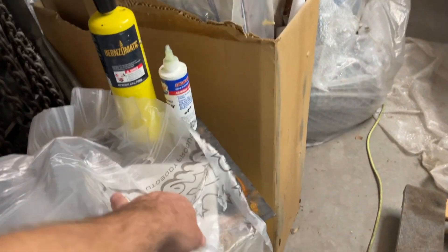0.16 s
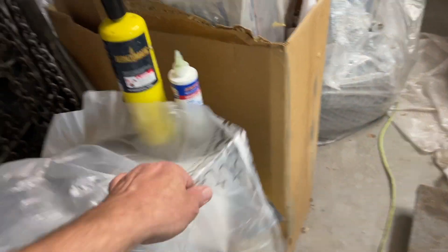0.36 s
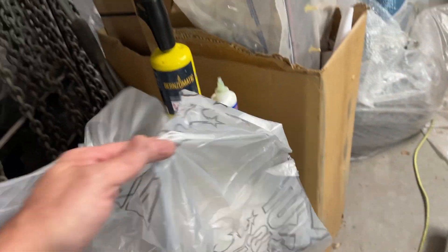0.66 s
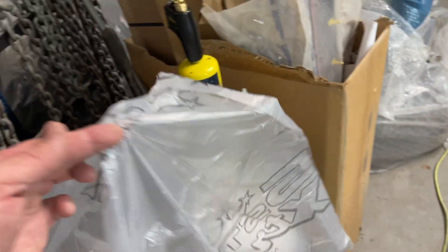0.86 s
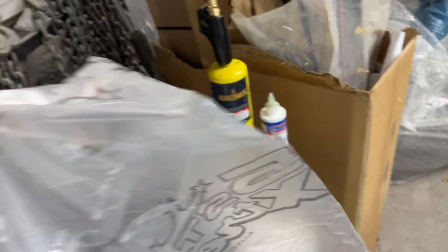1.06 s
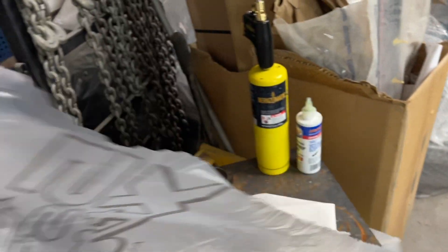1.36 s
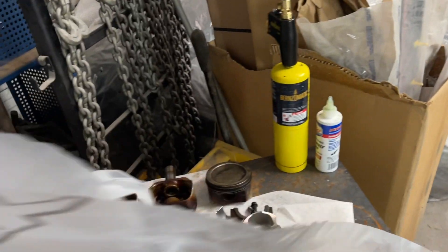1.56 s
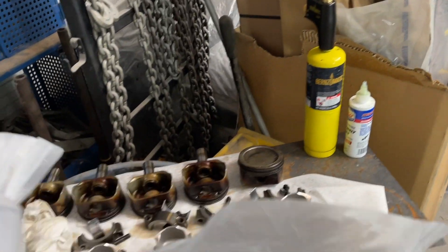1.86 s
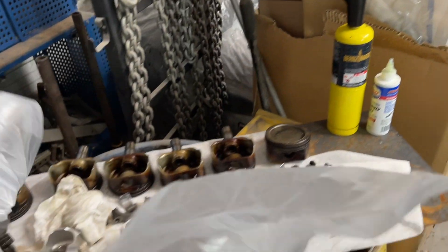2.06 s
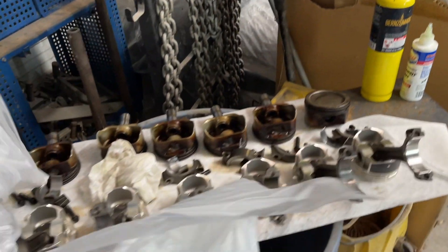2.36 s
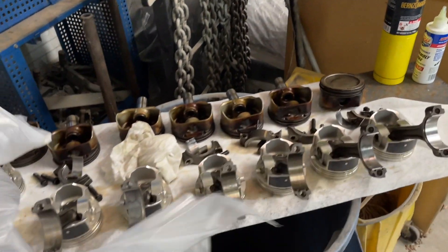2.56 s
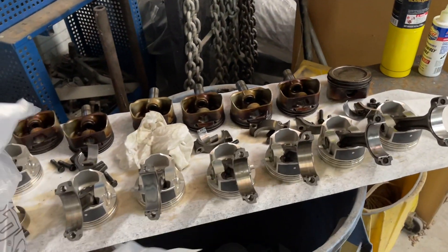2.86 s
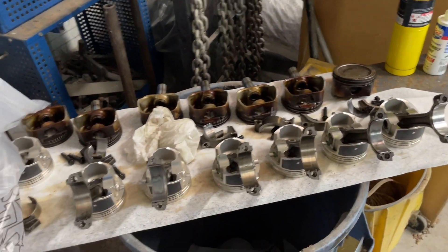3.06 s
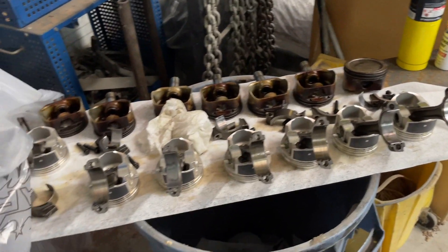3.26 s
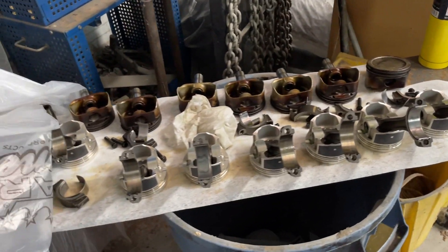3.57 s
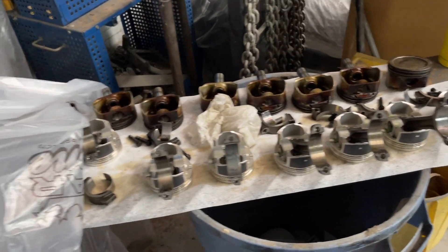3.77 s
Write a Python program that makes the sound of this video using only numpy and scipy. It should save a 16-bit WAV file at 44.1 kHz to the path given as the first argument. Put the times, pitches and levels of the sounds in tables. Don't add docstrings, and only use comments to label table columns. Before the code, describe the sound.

Thin plastic sheeting is pulled off a table within arm's reach, crinkling densely with quick tugs and sharp cracks, then thinning to one light hollow tap; a faint engine idles outside a small garage, close stereo phone pickup.

```python
import sys
import numpy as np
from scipy import signal
from scipy.fft import rfft, irfft, next_fast_len
from scipy.io import wavfile
from scipy.ndimage import uniform_filter1d, map_coordinates

SR = 44100
rng = np.random.default_rng(int(sys.argv[2]) if len(sys.argv) > 2 else 0)


def volts_from_decibels(level):
    exponent = np.asarray(level, float) / 20
    return 10 ** exponent


def int16_out(signal):
    q = np.round(np.clip(np.atleast_2d(signal).T, -1, 1) * 32767)
    wavfile.write(sys.argv[1], SR, q.astype(np.int16))


N = 171990

# (frequency [Hz], width [Hz], level [dB])
EXHAUST = [(44.4, 2.7, 2), (54.2, 3.6, 5.5), (81, 11, -16.5), (124.7, 4.3, -3.5), (136.5, 5.6, -2),
           (151.2, 2.7, -1.5), (162.3, 6, -12), (205.4, 2.9, -5), (266, 17, -19.5), (465, 17, -7)]
# (frequency [Hz], density [dB per Hz])
RUMBLE = [(15, -34), (25, -1), (48, 2.5), (141, 6.5), (214, -8.5), (251, -15), (400, -29.5), (520, -73),
          (880, -120)]
IDLE_HZ, IDLE_DRIFT = 13.68, .002
THROB_S, THROB_DB, THROB_SCATTER_DB = 2.113, -46.5, 0
RUMBLE_DB = -48.5

# (frequency [Hz], density [dB per Hz])
AIR = [(200, -6), (700, -11), (2000, -18.5), (5000, -32), (12000, -50)]
AIR_DB = -59

# (time [s], strength [dB], big folds against fine creases [dB])
PULL = [(0, -90, 0), (.065, -85, 0), (.095, -48, 1), (.25, -47.5, 1), (.37, -36, 2), (.6, -34.5, 2),
        (.77, -38.5, 1), (1.02, -41, 0), (1.38, -39.5, -1), (1.51, -36, 1), (1.77, -42.5, 0),
        (2.06, -38, 1), (2.15, -43, 0), (2.44, -37, -3), (2.59, -43.5, 0), (2.85, -44.5, -2),
        (3.53, -41.5, -3), (3.68, -46.5, -2)]
# (time [s], length [s], level [dB])
TUGS = [
    (0.132, .04, -39),
    (0.546, 0.034, -31.5),
    (0.65, 0.044, -36),
    (0.891, 0.044, -37.5),
    (1.213, 0.03, -41),
    (1.588, 0.03, -35.5),
    (1.886, 0.061, -38),
    (2.606, 0.042, -33.5),
    (2.7, 0.069, -33.5),
    (3.187, 0.088, -52),
]
# (time [s], peak level [dB])
CRACKS = [(.4264, -21), (.4834, -22), (.5484, -18), (.6594, -20), (.6724, -23), (1.1722, -24),
          (1.2042, -24), (1.5048, -9), (2.611, -13), (2.6294, -24), (2.6424, -25), (2.7057, -22),
          (2.7184, -18), (2.7304, -23), (3.7788, -29)]
# (frequency [Hz], density [dB per Hz])
FINE = [(1200, -16.5), (2200, -12), (5000, -8), (7800, -7), (10400, 1), (11500, -3.5), (13100, -19.5),
        (15800, -49)]
# (frequency [Hz], density [dB per Hz])
FOLDS = [(130, -25), (260, -5.5), (370, -2), (600, -6), (950, -4), (1500, -7), (3000, -7.5), (6000, -16.5)]
# (time [s], centre [Hz], depth [dB])
TABLE_DIP = [(0, 3680, 2), (.35, 3950, 7), (.8, 3150, 2.5), (1.2, 3220, 0.5), (2.6, 2900, 0),
             (2.9, 1560, 0), (3.9, 1480, 1.5)]
TABLE_DIP_OCTAVES = 0.16
PULL_DB, CLUMP_DB, FOLDS_DB = 4.5, 0.5, -11.5
TUG_ATTACK_S, TUG_RELEASE_S = .002, .015
SNAPS_PER_S, SNAP_T60_S, SNAP_SPREAD_DB = 680, 0.0053, 4
SMOOTH_DB = 7
CRACK_DB, CRACK_T60_S, CRACK_RISE_S = -3, .007, .0008
CRACK_DULL_DB = 1.5
POPS_PER_S, POP_DB = 500, -22
POP_HZ, POP_OCTAVES, POP_CYCLES = 1700, .7, 14

# (time [s], frequency [Hz], peak level [dB])
FLAPS = [
    (.925, 950, -27),
    (1.43, 310, -33),
    (1.62, 330, -32),
    (2.125, 205, -28),
    (2.55, 607, -31),
    (2.555, 326, -37),
    (2.718, 230, -28),
]
# (time [s], frequency [Hz], peak level [dB])
PINGS = [
    (1.5057, 3750, -14),
    (1.5057, 900, -26),
    (2.6115, 5500, -24),
    (3.7795, 3800, -26),
]
FLAP_CYCLES = 6.6

# (frequency [Hz], level [dB], T60 [s], delay [s])
BOX = [(161, -12.5, 0.12, 0.0091), (385, -17.5, 0.12, .012), (950, -6.5, 0.017, 0.00098),
       (1260, -16, 0.011, 0.0017), (733, -18, 0.04, .006), (2020, -15, 0.011, 0.0032)]
TAP_S, TAP_DB, TAP_T60_S = 3.5586, -16.5, 0.045
TAP_FROM_HZ, TAP_TO_HZ, TAP_SAG_S = 1100, 250, .0014

# (frequency [Hz], T60 [s])
GARAGE = [(200, 0.23), (2000, 0.17), (10000, 0.18)]
WET_DB = -10.5

# (frequency [Hz], correlation [-1 to 1])
ALIKE = [(60, 1), (500, 0.86), (1000, 0.82), (1600, 0.1), (2300, 0.85), (5200, 0.38), (7400, 0.4),
         (8400, 1)]
# (frequency [Hz], phase [rad])
LEAD = [(60, 0.38), (400, 0.55), (1200, 1.17), (1900, 0.65), (3000, 1.31), (6000, 0), (7500, 0.73),
        (8550, 0)]
TURN_FROM_HZ, TURN_HZ = 8414, 3514


def unit(x):
    return x / np.sqrt(np.mean(x ** 2) + 1e-20)


def along(points, hz):
    f, v = np.transpose(points)
    return np.interp(np.log(hz + 1), np.log(f + 1), v)


def curves(rows):
    s, *cols = np.transpose(rows)
    return [np.interp(np.arange(N) / SR, s, c) for c in cols]


def wobble(rate):
    knots = rng.standard_normal(int(N * rate / SR) + 4)
    return map_coordinates(knots, [np.arange(N) * rate / SR])


def filtered(x, response):
    m = next_fast_len(N + SR // 2)
    return irfft(rfft(x, m) * response(np.fft.rfftfreq(m, 1 / SR)), m)[..., :N]


def coloured(x, points):
    def response(hz):
        db = along(points, hz)
        return volts_from_decibels(db) / np.sqrt(np.mean(volts_from_decibels(2 * db)))
    return filtered(x, response)


def exhaust(f):
    pipe = sum(volts_from_decibels(db) * 1j * f * w / (c * c - f * f + 1j * f * w) for c, w, db in EXHAUST)
    low_cut = (1j * f / 38) ** 2 / (1 + 1j * f / 38) ** 2
    return pipe * low_cut / (1 + 1j * f / 350) ** 2


def engine():
    rate = IDLE_HZ * (1 + IDLE_DRIFT * wobble(1.92))
    turns = np.cumsum(rate) / SR
    at = np.flatnonzero(np.diff(np.floor(turns - turns[round(THROB_S * SR)])))
    pulses = np.zeros(N)
    pulses[at] = volts_from_decibels(THROB_SCATTER_DB * rng.standard_normal(99)[:len(at)])
    throb = volts_from_decibels(THROB_DB) * unit(filtered(pulses, exhaust))
    spectrum = [(10, -90)] + RUMBLE + [(900, -64)]
    rumble = filtered(rng.standard_normal((2, N)), lambda hz: volts_from_decibels(along(spectrum, hz)))
    return throb * [[1], [-.3]] + volts_from_decibels(RUMBLE_DB) * unit(rumble)


def air():
    noise = rng.standard_normal((2, N))
    return volts_from_decibels(AIR_DB) * unit(filtered(noise, lambda hz: volts_from_decibels(along(AIR, hz)) * (hz > 100)))


def patchy(patchy_db):
    z = signal.stft(rng.standard_normal((2, N)), nperseg=256)[2]
    field = uniform_filter1d(rng.standard_normal(z.shape[1:]), size=8, axis=0)
    field = uniform_filter1d(field, size=6, axis=1)
    return unit(signal.istft(z * volts_from_decibels(patchy_db * unit(field)), nperseg=256)[1][:, :N])


def snaps(per_s, t60, spread_db):
    chance = rng.random(N)
    size = np.minimum(rng.exponential(size=N), 3)
    struck = chance < per_s * volts_from_decibels(3 * wobble(25)) / SR
    power = struck * volts_from_decibels(2 * spread_db * size)
    power = signal.lfilter([1], [1, -volts_from_decibels(-120 / (t60 * SR))], power)
    return unit(np.sqrt(power / power.mean() + volts_from_decibels(2 * SMOOTH_DB)))


def tugs():
    t = np.arange(N) / SR
    total = np.zeros(N)
    for s, hold, db in TUGS:
        rise = np.clip((t - s) / TUG_ATTACK_S, 0, 1)
        fall_db = 60 * np.clip(t - s - hold, 0, 9) / (6 * TUG_RELEASE_S)
        total += volts_from_decibels(db - fall_db) * rise
    return total


def cracks():
    total = np.zeros(N)
    for s, db in CRACKS:
        u = np.clip(np.arange(N) / SR - s, 0, 1)
        total += volts_from_decibels(db + CRACK_DB - 60 * u / CRACK_T60_S) * (1 - np.exp(-u / CRACK_RISE_S))
    return total


def pops(swing):
    when, pitch, size, side = rng.random((2000, 4)).T
    at = (when * 2000 / POPS_PER_S * SR).astype(int)
    hz = np.clip(POP_HZ * 2 ** (POP_OCTAVES * 2 * (2 * pitch - 1)), 450, 7000)[:, None]
    u = np.arange(1500) / SR
    rings = np.sin(2 * np.pi * hz * u) * np.exp(-u * hz / POP_CYCLES * 3) * (1 - np.exp(-u * hz))
    rings = rings * volts_from_decibels(-3 * np.log(size + .05))[:, None]
    where = (at[:, None] + np.arange(1500)).ravel()
    weights = (np.ones(2000), np.sign(side - .5))
    pair = [np.bincount(where, (rings * w[:, None]).ravel(), N)[:N] for w in weights]
    return volts_from_decibels(POP_DB) * swing * unit(np.array(pair))


def table_echo(x):
    hz, t, z = signal.stft(x, SR, nperseg=512)
    s, centre, depth = np.transpose(TABLE_DIP)
    off = np.log2((hz[:, None] + 1) / np.interp(t, s, centre)) / TABLE_DIP_OCTAVES
    dip = volts_from_decibels(-np.interp(t, s, depth) * np.exp(-off ** 2))
    return signal.istft(z * dip, SR, nperseg=512)[1][:, :N]


def sheet():
    pull_db, folds_db = curves(PULL)
    clumps = volts_from_decibels(CLUMP_DB * wobble(22.015) + 0.32 * wobble(45))
    effort = np.hypot(volts_from_decibels(pull_db + PULL_DB), tugs()) * clumps
    sharp = cracks()
    crackle = effort * snaps(SNAPS_PER_S, SNAP_T60_S, SNAP_SPREAD_DB)
    fine = coloured(patchy(1.15) * (crackle + sharp), FINE)
    swing = effort * volts_from_decibels(folds_db + 0.85 * wobble(9))
    rustle = swing * snaps(250, 0.011, 2.2)
    folds = coloured(patchy(2.0) * (rustle + volts_from_decibels(CRACK_DULL_DB) * sharp), FOLDS)
    return table_echo(fine + volts_from_decibels(FOLDS_DB) * folds + pops(swing))


def ring(s, hz, db, t60, attack):
    u = np.clip(np.arange(N) / SR - s, 0, 9)
    return volts_from_decibels(db - 60 * u / t60) * np.sin(2 * np.pi * hz * u) * (1 - np.exp(-u / attack))


def flaps():
    return sum(ring(s, hz, db, FLAP_CYCLES / hz * 1.72, 0.9 / hz) for s, hz, db in FLAPS + PINGS)


def tap():
    u = np.clip(np.arange(N) / SR - TAP_S, 0, 9)
    hz = (TAP_TO_HZ + (TAP_FROM_HZ - TAP_TO_HZ) * np.exp(-u / TAP_SAG_S)) * (u > 0)
    envelope = volts_from_decibels(TAP_DB - 60 * u / TAP_T60_S) * (1 - np.exp(-u / 0.0016))
    panel = envelope * np.sin(2 * np.pi * np.cumsum(hz) / SR)
    box = sum(ring(TAP_S + late, hz, TAP_DB + db, t60, 0.00022) for hz, db, t60, late in BOX)
    return box - panel


def garage(x):
    hz, t, z = signal.stft(rng.standard_normal((2, SR // 2)), SR, nperseg=256)
    tail = signal.istft(z * volts_from_decibels(-60 * t / along(GARAGE, hz)[:, None]), SR, nperseg=256)[1]
    tail = tail / np.linalg.norm(tail[0])
    return signal.fftconvolve(np.pad(x, (400, 0))[None], tail, axes=1)[:, :N]


def microphones(pair):
    def shares(hz):
        turn = np.arccos(np.clip(along(ALIKE, hz), -1, 1)) / 2
        return np.array([np.cos(turn), np.sin(turn)])

    def leads(hz):
        lead = along(LEAD, hz) - 2 * np.pi * np.clip(hz - TURN_FROM_HZ, 0, None) / TURN_HZ
        return np.exp(.5j * lead * np.array([[1], [-1]]))

    mid, side = filtered(pair, shares)
    return filtered(np.array([mid + side, mid - side]), leads)


def scene():
    knocks = tap() + flaps()
    near = sheet() + knocks * [[1], [0]]
    return microphones(near + volts_from_decibels(WET_DB) * garage(knocks) + engine() + air())


def low_pass(x):
    return signal.sosfilt(signal.butter(12, 15970, fs=SR, output="sos"), x)


def record(dry):
    return low_pass(dry)


dry = scene()
out = record(dry)
int16_out(out)
```